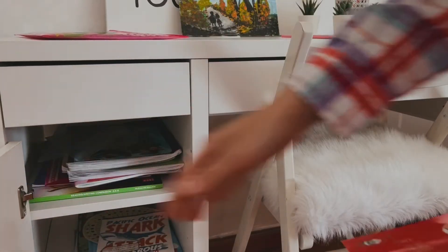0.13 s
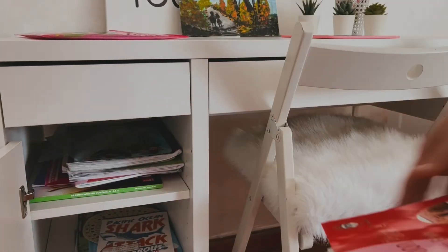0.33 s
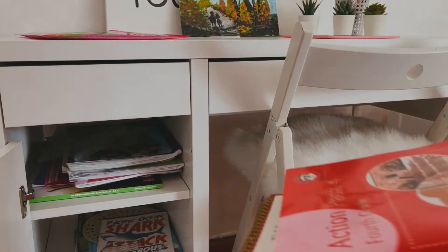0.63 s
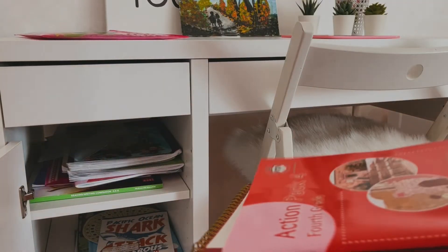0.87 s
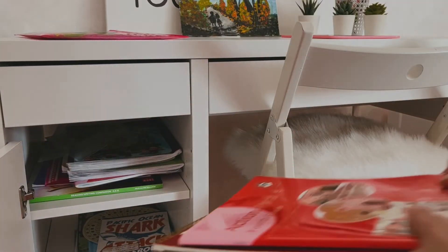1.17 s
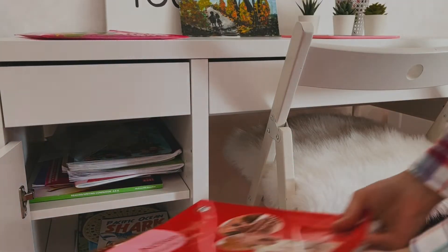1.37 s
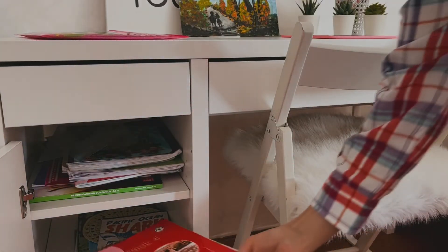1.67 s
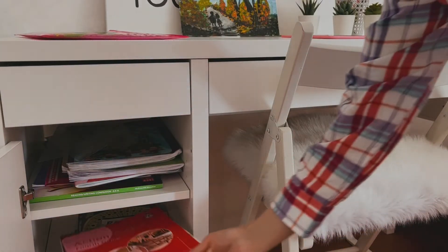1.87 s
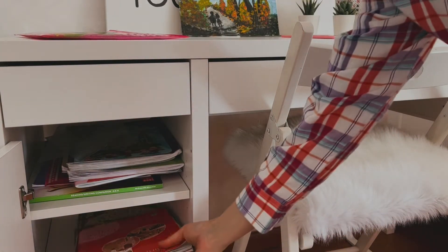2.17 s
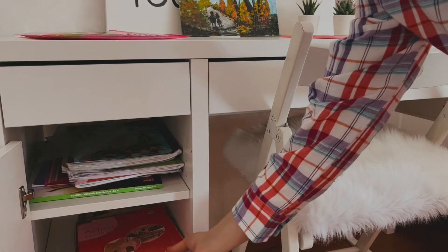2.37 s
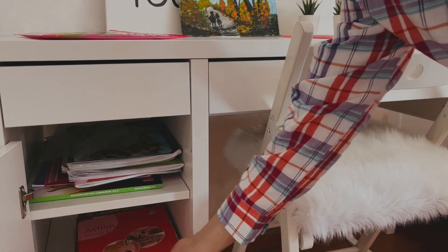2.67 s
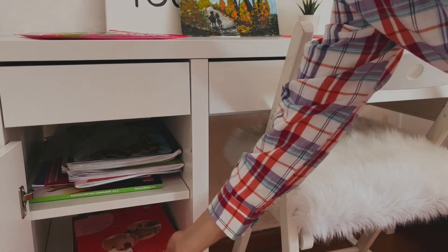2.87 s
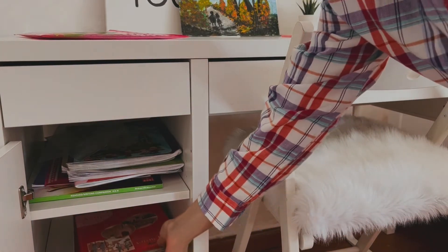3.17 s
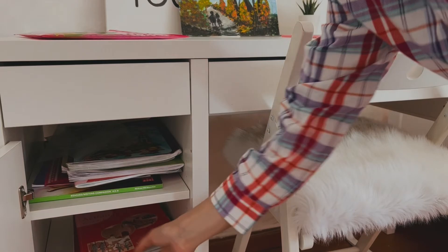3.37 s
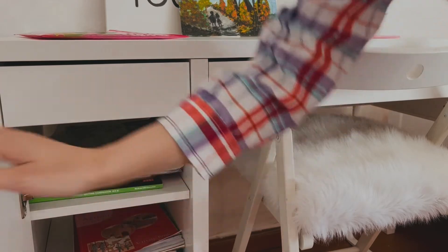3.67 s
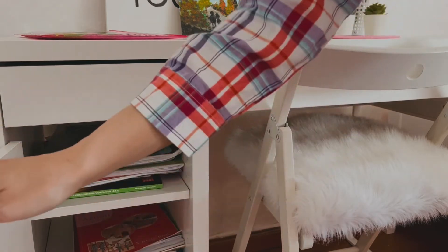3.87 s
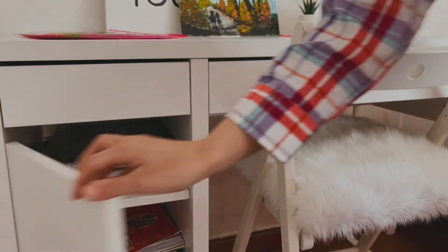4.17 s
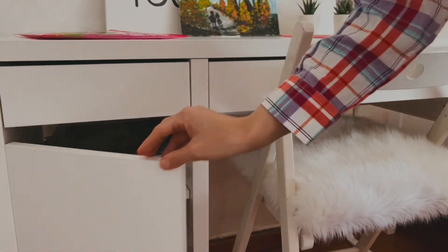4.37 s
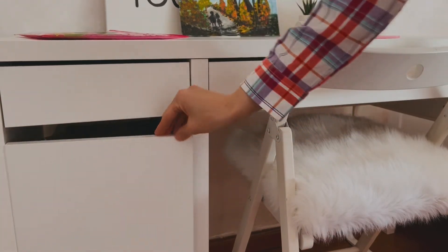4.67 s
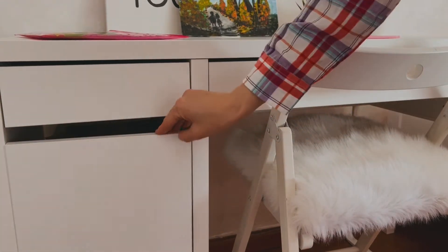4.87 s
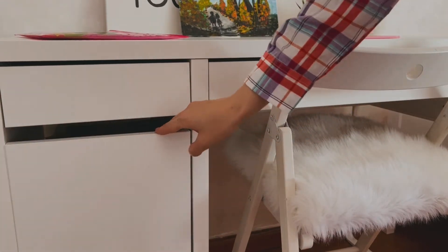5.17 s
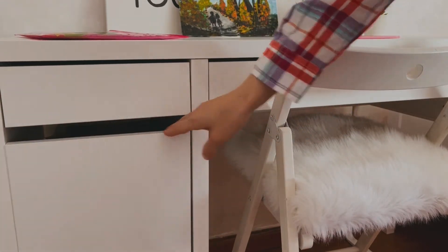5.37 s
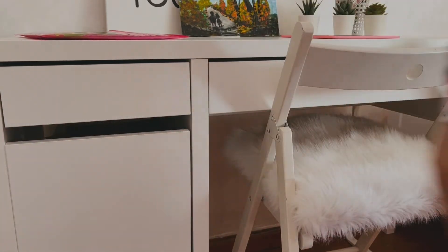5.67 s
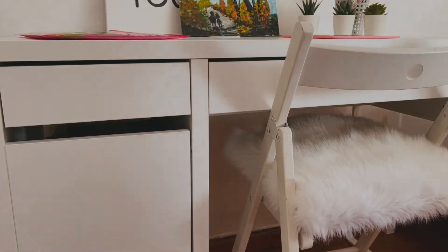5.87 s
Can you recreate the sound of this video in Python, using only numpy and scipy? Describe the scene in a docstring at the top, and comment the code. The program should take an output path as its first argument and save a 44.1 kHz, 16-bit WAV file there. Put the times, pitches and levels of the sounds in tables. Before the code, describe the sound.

Close stereo pickup in a quiet, softly reverberant home room. A light wooden cupboard door swings open with low, hollow thumps. A glossy book rubs, ticks and crackles, its cover slapping lightly. It drops on the bottom shelf with a woody thud, knocks and scrapes into place. After a pause the door rattles, swings and bumps shut twice, fingertips dragging and squeaking on its painted face.

```python
"""A low cupboard in a quiet room, a metre from a two-port microphone, over a faint rumble and hiss.
Its door swings open: struck panels ring, shaken boards boom. A glossy book is handled: noise bands rub,
tick and crackle, a cover slaps shut. The book is dropped and slid onto the bottom shelf, ringing its modes.
The door is swung shut with two bumps while fingertips drag and squeak on it through narrow resonances.
The room answers briefly through decaying noise echoes."""
import sys
import numpy as np
from scipy import signal
from scipy.fft import rfft, irfft, next_fast_len
from scipy.io import wavfile
from scipy.ndimage import uniform_filter1d

SR = 44100
rng = np.random.default_rng(int(sys.argv[2]) if len(sys.argv) > 2 else 0)


def to_wav(s):
    """Save 16-bit WAV."""
    ch = np.atleast_2d(s).T  # columns
    pcm = np.round(np.clip(ch, -1, 1) * 32767)  # PCM
    wavfile.write(sys.argv[1], SR, pcm.astype(np.int16))


N = 265261
T_S = np.arange(N) / SR

# Background density: f/Hz, relative density/dB per Hz
HUSH_SPECTRUM = [(25, -3.5), (50, 3), (100, -9.5), (200, -20.5), (500, -18.5), (1200, -31.5), (3000, -39),
                 (8000, -41.5), (12000, -35.5), (16000, -51.5)]
HUSH_RMS_DB = -71.5

# Panel modes: f/Hz, level/dB, t60/s (undamped by contact)
SHELF_MODES = [(62.5, -11.5, 0.27), (97.7, -7, 0.3), (157.5, -3.5, 0.26), (170.6, -3.5, 0.32),
               (195.3, 3, 0.33), (237.4, -2, 0.24), (268, 6, 0.2), (315.5, -6, 0.31), (347, -5.5, 0.11),
               (371.2, -0.5, 0.14), (420.6, -9, 0.088), (458, -3.5, 0.17), (478, -6, 0.1), (524.2, 5, 0.12),
               (571.6, 0, 0.068), (614, -8.5, 0.075), (639.4, -8.5, 0.14), (717, -9, 0.21),
               (777, -1, 0.056), (858, 0, 0.05), (987, -2, 0.044), (1043, -8, 0.05), (1117, 1.5, 0.049),
               (1200, -3, 0.045), (1294, -3.5, 0.031), (1421, -9, 0.051), (1630, -19, 0.024),
               (1900, -18.5, 0.04), (3800, -21.5, 0.023)]
DOOR_MODES = [(56, -9.5, 0.38), (74.9, 0.5, 0.46), (99, -1, 0.17), (120.4, -0.5, 0.14), (144.8, -1, 0.21),
              (176.6, -1, 0.14), (205.8, 0, 0.17), (250.9, 0.5, 0.14), (324.3, 0.5, 0.1), (396.5, -2, 0.16),
              (481, 0, 0.088), (554, 3.5, 0.059), (705, 7, 0.041), (897, 4, 0.022), (1230, -9.5, 0.021),
              (1447, -31, 0.022), (1850, -4.5, 0.032)]

# Strokes below: t/s is when full level is reached; rise/s and fall/s are the times for 20 dB.
# Panels shaken by the swinging door and the sliding book: t/s, rise/s, hold/s, fall/s, boom/dB, wood/dB
SHAKES = [(0.0, .1, .0, 0.22, -39, -48.5), (0.17, 0.23, 0, 0.34, -46.5, -58),
          (1.1, 0.18, 0.75, 0.16, -61.5, -69), (2.05, 0.016, 0.0092, 0.09, -65.5, -32),
          (2.16, 0.036, 0.029, .1, -58, -61.5), (2.28, 0.092, 0.028, 0.05, -71, -36.5),
          (2.42, 0.16, 0.11, 0.077, -57, -59), (3.0, 0.42, 0.25, 0.093, -62.5, -64.5),
          (4.33, 0.2, 0.084, 0.25, -54, -52), (4.55, 0.52, 0.076, 0.044, -50, -68),
          (4.82, 0.1, 0.018, 0.13, -73, -48.5), (4.95, 0.086, 0.0067, 0.13, -52.5, -59.5),
          (5.08, 0.064, 0.11, 0.12, -55.5, -62)]
# Shaking that never rests: boom/dB, wood/dB
SHAKE_REST_DB = (-71.5, -80.5)
# Nearly shut door rolling on the air of the cupboard: t/s, rise/s, hold/s, fall/s, level/dB
AIR_ROLLS = [(4.36, 0.1, 0.16, 0.16, -44.5), (4.69, .015, 0.052, 0.18, -45), (4.95, .1, 0.054, 0.2, -58.5),
             (5.28, .015, 0.039, 0.11, -50)]

# Blows of door, hinge and frame: t/s, level/dB, bass/dB, board/dB, 500 Hz/dB, 1200 Hz/dB, slap/dB,
# settling/s, settling/dB
DOOR_BLOWS = [(0.048, -38, -15, -35, -8.5, -14, -47, 0.037, 1),
              (0.067, -31, -31, -5, -37, -32, -76, 0.15, -6),
              (0.212, -38.5, -1, -5, -24.5, -31, -87, 0.057, -3),
              (3.784, -51.5, 10, -10, -24, -34, -88, 0.028, 3),
              (3.869, -64, 3.5, -5.5, -21.5, -38, -87.5, 0.02, -5),
              (4.134, -56, -17, -4.5, -4.5, -19.5, -88, 0.01, -2.5),
              (4.14, -46.5, -15, 1, -5, -2, -90, 0.0059, 4),
              (4.147, -40.5, -18, 1, -6, -13, -93, 0.017, 6.5),
              (4.158, -32, -40, -8, -18.5, -23, -90, 0.03, 0),
              (4.177, -41, -25, 0.5, -5, -23, -80, 0.02, -3), (4.21, -36, -25, -8, -14, -22, -85, 0.023, 2),
              (4.356, -39, -7, -18.5, -17.5, -31, -86, 0.051, 5),
              (4.439, -31.5, -21, -21, -29.5, -28, -84, 0.07, 1.5),
              (4.487, -41, -14, -13, -20, -30, -86, 0.035, -2),
              (4.53, -46.5, -11, -12, -28, -34, -87, 0.033, 3),
              (4.678, -24, -20, -15.5, -13, -29, -48.5, 0.021, -8),
              (4.69, -29, -14, -10, -20, -28, -64, 0.024, 0.5),
              (4.756, -38, -25, -15, -16, -14.5, -84, 0.086, -11),
              (5.265, -36, -8.5, -14, -18, -27, -65, 0.021, -3)]
# Blows of the book on the shelf: same columns
BOOK_BLOWS = [(1.649, -51, -12.5, -15, 9, -10.5, -57.5, 0.021, 1.5),
              (1.662, -54, -4, -12, -1, -22, -84, 0.0092, -3.5),
              (1.69, -62.5, -10, -8, 6.5, -12, -85, 0.0095, -4.5),
              (1.732, -61.5, 2, -2.5, 5, -17.5, -85, 0.01, -6),
              (1.765, -69.5, 1.5, -7.5, -0.5, -17, -89, 0.012, -6),
              (2.037, -25.5, -14.5, -3, -26.5, -12.5, -53, 0.02, -8.5),
              (2.057, -28.5, -12.5, -2.5, -33.5, -31, -57, 0.021, -1.5),
              (2.1, -32.5, -8, -15, -24.5, -29.5, -67, 0.014, -0.5),
              (2.08, -31.5, -15, -7, -31, -32, -65, 0.011, -4.5),
              (2.125, -34.5, -14, -17, -27.5, -30.5, -70.5, 0.014, -2.5),
              (2.193, -48.5, -6, -11.5, -25, -31, -57.5, 0.055, -3),
              (2.241, -31.5, -28, -12, 6, 0, -51.5, 0.0074, -9),
              (2.258, -31.5, -21, -11.5, -9.5, -17, -67, 0.0072, -4.5),
              (2.309, -34.5, -29, -16.5, -14, -25, -59, 0.011, 2.5),
              (2.345, -47.5, -23, -9.5, -8.5, -11, -73, 0.019, -4),
              (2.43, -48, -31, -19, -5.5, -18, -73, 0.026, -2),
              (2.772, -49, -11, 2, -4.5, -30.5, -66, 0.0085, 1.5),
              (2.797, -47, -21, -2.5, -18, -37, -65, 0.014, 1.5),
              (2.835, -50.5, -15, -3, -24, -27, -74, 0.019, -8),
              (2.87, -54, -20, -8, -28, -33, -77, 0.011, -15)]
# Colour anchors, f/Hz: bass, fixed 0 dB, board, 500 Hz, 1200 Hz
SHELF_COLOUR_HZ = [80, 180, 280, 520, 1200]
DOOR_COLOUR_HZ = [65, 135, 260, 520, 1200]
# Each blow lands elsewhere and loads the panel differently
DETUNE_RATIO, UNEVEN_DB = .007, 1.5

# Hand on the door: t/s, rise/s, hold/s, fall/s, scuff/dB, papery edge/dB, fizz/dB, dull part/dB
DOOR_RUBS = [(0.048, 0.07, 0.0015, 0.1, -66.5, -76, -72, -59.5),
             (0.2, 0.068, .0, 0.087, -85, -85, -80, -65),
             (4.146, 0.014, 0.012, 0.12, -68.5, -97, -94, -48.5),
             (4.198, 0.052, 0.013, 0.28, -58, -94, -84, -50), (4.33, 0.11, 0.13, 0.13, -85, -80, -94, -58),
             (4.45, .1, 0.03, 0.056, -84, -83, -92, -65.5), (4.55, .08, 0, 0.027, -90, -89, -93, -70),
             (4.685, 0.011, 0.0066, 0.031, -54, -82, -53, -49), (4.719, 0.029, 0, 0.1, -61, -88, -92, -51),
             (4.836, 0.006, 0.015, 0.04, -87, -94, -88, -59.5),
             (4.87, 0.029, 0.00011, 0.14, -62.5, -82, -66, -50.5),
             (5.075, 0.025, 0.07, 0.098, -86, -99, -87, -59),
             (5.269, 0.015, 0.0021, 0.1, -69, -81, -89, -59),
             (5.64, 0.074, 0.0026, 0.048, -73, -89, -93, -73.5)]
# Cover and pages rubbing: same columns
BOOK_RUBS = [(0.465, 0.028, 0.019, 0.092, -68.5, -79, -59.5, -71),
             (0.58, 0.012, 0.13, 0.061, -72.5, -81, -70, -72.5),
             (0.695, 0.04, 0.021, 0.14, -67.5, -73, -66.5, -71),
             (0.77, 0.027, 0.0017, 0.046, -73, -80, -73, -63), (0.82, 0.048, 0, 0.11, -70.5, -73, -64, -93),
             (1.058, 0.091, 0.012, 0.014, -66.5, -69, -59, -67),
             (1.093, 0.011, 0.017, 0.032, -67, -76, -63, -60),
             (1.116, 0.024, 0.014, 0.044, -65.5, -79, -59.5, -59),
             (1.235, 0.031, 0.013, 0.036, -62, -78, -71, -61),
             (1.19, 0.05, 0.013, 0.037, -73, -80, -70, -61),
             (1.31, 0.091, 0.051, 0.19, -70.5, -84, -98, -71),
             (1.485, 0.11, 0.000023, 0.13, -69.5, -84, -79, -61.5),
             (1.66, 0.028, .0, 0.12, -67.5, -77, -67, -57), (1.78, 0.1, 0.16, 0.16, -85, -91, -80.5, -81.5),
             (2.042, 0.023, 0.097, 0.35, -71, -64.5, -63.5, -59.5),
             (2.242, 0.1, 0.027, 0.085, -61.5, -60.5, -60, -63.5),
             (2.47, 0.17, 0.035, 0.033, -99, -89, -76, -77),
             (2.71, 0.13, 0.038, 0.12, -81.5, -89, -79, -81),
             (2.775, 0.013, 0.13, .2, -77.5, -80, -74.5, -76),
             (2.93, 0.27, 0.05, 0.25, -83, -67, -63.5, -65),
             (3.12, 0.077, 0.072, 0.12, -87, -74.5, -76.5, -67.5),
             (3.24, 0.22, 0.047, 0.021, -87.5, -80, -80, -85.5)]
# Faint hiss slowly swelling and fading: same columns
HISS_SWELLS = [(1.301, 0.31, 0.49, .15, -91, -80.5, -76.5, -96),
               (3.4, 0.43, 0.18, 0.44, -92.5, -91, -94, -93),
               (3.68, 0.26, 0.061, 0.34, -95, -84, -81.5, -86), (4.06, 0.26, 0.2, .3, -88, -87.5, -83, -80),
               (5.348, 0.46, 0.77, 0.39, -87, -86, -79, -82)]
# Clothing that never quite rests: scuff/dB, papery edge/dB, fizz/dB, dull part/dB
CLOTH_REST_DB = (-101.5, -100, -92.5, -91.5)
# Swell and fade of each part, as a share of the scuff's dB
EDGE_FADE, FIZZ_FADE, DULL_FADE = 1.28, 1.4, 0.98
# Glossy covers fizz higher than painted board
BOOK_FIZZ_TOP_HZ, DOOR_FIZZ_TOP_HZ = 14900, 11060

# Cover and page edges snapping: t/s, edge level/dB, f/Hz, body level/dB, decay/s
TICKS = [(0.205, -58.5, 3170, -67, 0.0014), (0.484, -46, 4870, -73, 0.0016),
         (0.591, -52.5, 4460, -55.5, 0.0022), (0.693, -42.5, 4340, -50, 0.0016),
         (0.828, -47, 5400, -47.5, 0.0016), (1.032, -50, 3600, -56, 0.003),
         (1.058, -44.5, 3600, -51, 0.0028), (1.079, -44.5, 4800, -55, 0.0015),
         (1.089, -40, 2280, -46.5, 0.0053), (1.115, -39.5, 3730, -61, 0.0018),
         (1.185, -49, 2390, -60, 0.003), (1.201, -52, 2500, -46.5, 0.0022),
         (1.2253, -47, 2040, -39.5, 0.0034), (1.283, -48.5, 6600, -69, 0.0023),
         (1.679, -56, 11000, -79, 0.0037), (2.068, -46.5, 3740, -75, 0.011),
         (3.57, -62.5, 2230, -92.5, 0.0019)]
# Resonant patches of the rubbed cover, and one short dull knock near 600 Hz:
# t/s, rise/s, hold/s, fall/s, level/dB, f/Hz, width/Hz
BOOK_RESONANCES = [(0.457, .01, 0.018, 0.073, -61, 4500, 600), (0.458, 0.011, 0.026, 0.068, -69, 2580, 900),
                   (0.584, .01, .004, .03, -69, 4500, 1000), (0.628, 0.047, 0.024, .04, -74, 4500, 500),
                   (0.68, 0.013, 0.011, 0.035, -61, 4430, 700),
                   (0.683, .015, 0.016, 0.045, -68.5, 2600, 600), (0.77, .02, .02, .03, -67.5, 1390, 600),
                   (0.81, 0.0081, 0.014, 0.021, -66, 5000, 600),
                   (0.821, 0.014, 0.0087, 0.032, -61.5, 1120, 400),
                   (0.824, .02, 0.016, 0.039, -72, 3500, 400), (1.856, .004, 0.0069, 0.02, -67.5, 600, 293),
                   (1.078, .005, .003, .012, -64, 2400, 600), (1.18, .006, .008, .008, -65, 2400, 700),
                   (1.053, .02, 0.0064, .008, -56, 3440, 800), (2.046, .006, 0.033, .05, -66.5, 3800, 496),
                   (1.091, .004, 0.0055, 0.023, -59.5, 2300, 400),
                   (1.114, .012, 0.0074, .025, -68, 3580, 900)]
# Door face resonances singing under the fingers: same columns
DOOR_SQUEAKS = [(4.872, 0.027, .02, 0.036, -55, 755, 40), (4.925, .015, 0.042, 0.034, -64, 1450, 25),
                (5.097, .02, 0.035, 0.026, -78, 1440, 40), (5.125, .02, .04, 0.034, -60, 434, 40)]
# Crackling patches of the cover: f/Hz
COVER_PATCH_HZ = [1260, 2024, 3370, 4140, 6535]
CRACKLE_RE_SCUFF_DB = -6
# Stiff cover slapping shut: t/s, peak/dB, low edge f/Hz, high edge f/Hz
COVER_SLAP = (1.2264, -32, 350, 4000)

# Book's underside sliding on the shelf: t/s, rise/s, hold/s, fall/s, level/dB
SLIDES = [(1.66, 0.022, 0.0092, 0.065, -68), (2.25, .015, 0.023, 0.089, -51),
          (2.34, 0.074, 0.02, 0.088, -60.5), (2.44, 0.056, 0.029, 0.084, -81),
          (2.91, 0.09, 0.031, 0.11, -75.5), (2.99, 0.088, 0.036, 0.14, -63.5),
          (3.14, 0.093, 0.02, 0.08, -62.5), (3.2, 0.06, 0.015, 0.076, -65.5)]
# Fingertips dragged on the door face: t/s, rise/s, hold/s, fall/s, level/dB
DRAGS = [(4.2, 0.051, 0.049, 0.16, -62.5), (4.3, 0.05, 0.057, 0.23, -64),
         (4.695, 0.015, 0.0092, 0.074, -50), (4.84, 0.0046, 0.034, 0.058, -66.5),
         (4.89, 0.042, 0.035, 0.041, -53), (5.135, 0.073, 0.0039, 0.042, -61)]
# Resonances they excite: f/Hz, width/Hz, level/dB
DRAG_MODES = [(391.3, 9.7, 0.5), (476, 35, -23), (738, 25, -4.5), (1045, 6.9, -15.5), (1418, 12, -14),
              (1735, 27, -15.5), (1967, 42, -13), (2426, 29, -22.5), (2613, 22, -32), (2970, 83, -21.5),
              (3430, 70, -18.5), (3900, 82, -20)]

# Room decay: f/Hz, t60/s
ROOM_T60 = [(60, 0.32), (500, 0.44), (2000, 0.26), (10000, 0.2)]
ROOM_DB, SCATTER_DB = -4, 0.5
# Random drift of the blend of echo patterns
BLEND_DRIFT_PER_S, BLEND_DRIFT_RAD = 12, 1.5
# Two ports: f/Hz, left lead/rad, likeness/0-1, left minus right/dB
PORTS = [(0, 0, .99, -.5), (125, 0, .96, -.5), (250, 0, .85, .4), (500, -1.1, .62, 2.8),
         (1000, -.4, .5, .5), (1700, 0, .4, 0), (2400, .8, .78, 3), (4500, .8, .75, 3), (5200, 0, .6, 2),
         (6200, -1.2, .7, 1), (7900, -3.0, .94, 0), (8600, -3.2, .95, 0), (10000, -4.7, .9, 0),
         (11400, -6.15, .95, 0), (12500, -6.4, .93, 0), (14100, -8.2, .88, 0), (15500, -9.45, .99, 0)]
MIC_LOW_HZ, TOP_HZ = 39.6, 15600


def undb(db):
    """Amplitude ratio from dB."""
    return 10 ** (np.asarray(db) / 20)


def unit(x):
    """Scale to rms 1."""
    return x / np.sqrt(np.mean(x ** 2))


def band(x, lo_hz, hi_hz, order=2):
    """Butterworth band-pass."""
    edges_hz = [lo_hz, min(hi_hz, .45 * SR)]
    return signal.sosfilt(signal.butter(order, edges_hz, "bandpass", fs=SR, output="sos"), x)


def walk(rate_per_s):
    """Random levels held 1 / rate and slewed twice; spread near 1."""
    hold = int(SR / rate_per_s)
    steps = np.repeat(rng.standard_normal(N // hold + 1), hold)
    return 0.58 * uniform_filter1d(uniform_filter1d(steps, hold), hold)[:N]


def grit(per_s, spread_db, smooth):
    """Friction slips of uneven size and random sign over a smooth hiss."""
    size_db = spread_db * np.minimum(rng.exponential(size=N), 3)
    struck = rng.random(N) < per_s / SR
    slips = struck * undb(size_db) * rng.choice([-1, 1], N)
    return unit(slips) + smooth * rng.standard_normal(N)


def add(out, start_s, x):
    """Mix x into out from start_s."""
    i = int(start_s * SR)
    out[i:i + len(x)] += x[:N - i]


def strokes(table, shares=(1, 1, 1, 1)):
    """Power-summed dB of each level column; strokes rise, hold and fall in straight dB lines."""
    t = T_S[::32]
    start, rise, hold, fall, *levels_db = (c[:, None] for c in np.transpose(table))
    before = (start - t) / np.maximum(rise, .002)
    after = (t - start - hold) / np.maximum(fall, .002)
    shape_db = -20 * np.maximum(0, np.maximum(before, after))
    tracks = []
    for level_db, share in zip(levels_db, shares):
        power = np.sum(undb(level_db + share * shape_db) ** 2, axis=0)
        tracks.append(np.interp(T_S, t, 10 * np.log10(1e-20 + power)))
    return tracks


def steady(levels_db):
    """A stroke that holds throughout."""
    return [(0, 1, N / SR, 1, *levels_db)]


def ringing(db, modes, lo_hz, hi_hz, damping, per_s):
    """Gritty jostling rings the modes between two frequencies; damping divides their t60."""
    t = T_S[:SR // 2]
    ring = np.zeros(len(t))
    for hz, gain_db, t60_s in modes:
        if lo_hz < hz < hi_hz:
            ring += np.sin(2 * np.pi * hz * t) * undb(gain_db - 60 * damping * t / t60_s)
    jostle = unit(grit(per_s, 4.0, 0.94)) * undb(db)
    return signal.fftconvolve(jostle, ring / np.linalg.norm(ring))[:N]


def hush():
    """Distant house and street rumble with faint microphone hiss: half-octave noise, wavering levels."""
    hz, db = np.transpose(HUSH_SPECTRUM)
    out = np.zeros(N)
    for centre in 25 * 2 ** np.arange(0, 9.5, .5):
        noise = unit(band(rng.standard_normal(N), centre / 2 ** .25, centre * 2 ** .25))
        level_db = np.interp(np.log(centre), np.log(hz), db) + 1.6 * walk(5.5)
        out += noise * np.sqrt(centre) * undb(level_db)  # density to band level
    return unit(out) * undb(HUSH_RMS_DB)


def shaking():
    """The big door panel booms and rolls on its low modes, the smaller boards hum."""
    boom_db, wood_db = strokes(SHAKES + steady(SHAKE_REST_DB))
    roll = ringing(strokes(AIR_ROLLS)[0], DOOR_MODES, 90, 130, damping=0.89, per_s=200.)
    boom = ringing(boom_db, DOOR_MODES, 0, 130, damping=0.8, per_s=140.0)
    wood = ringing(wood_db, DOOR_MODES + SHELF_MODES, 130, 420, damping=1.0, per_s=120.)
    return roll + boom + wood


def blows(table, modes, colour_hz, slap_t60_s):
    """A blow and the small contacts that follow it ring the panel modes; the surfaces slap."""
    out, t = np.zeros(N), T_S[:SR // 2]
    hz, mode_db, t60_s = (c[:, None] for c in np.transpose(modes))
    sign = (-1) ** np.arange(len(hz))[:, None]
    for start_s, level_db, *colour_db, slap_db, settle_s, settle_db in table:
        contact_noise, slap_noise = rng.standard_normal((2, len(t)))
        shift, uneven = rng.standard_normal((2, len(hz), 1))
        decay = undb(mode_db + UNEVEN_DB * uneven - 60 * t / t60_s)
        rings = sign * np.sin(2 * np.pi * hz * (1 + DETUNE_RATIO * shift) * t) * decay

        settle_s = max(settle_s, .002)
        push = undb(settle_db) * contact_noise * np.exp(-t / settle_s) / np.sqrt(settle_s * SR)
        push[0] += 1  # the blow itself

        anchors_db = np.insert(colour_db, 1, 0)
        colour = undb(np.interp(np.log(hz[:, 0]), np.log(colour_hz), anchors_db))
        add(out, start_s, undb(level_db - 2.0) * signal.fftconvolve(colour @ rings, push)[:len(t)])
        slap = band(slap_noise, 1200, 9200, order=1)
        add(out, start_s, undb(slap_db - 60 * t / slap_t60_s) * slap)
    return out


def rubbing(table, fizz_top_hz):
    """Gritty friction: a scuff, a papery edge, a fizz on top and a dull part that passes into the wood."""
    scuff_db, edge_db, fizz_db, dull_db = strokes(table, (1, EDGE_FADE, FIZZ_FADE, DULL_FADE))
    slips = grit(1200., 3.4, 1.0) * undb(0.93 * walk(44))
    scuff = unit(band(slips, 1400, 3570)) * undb(scuff_db + 1.5 * walk(26))
    edge = unit(band(slips, 2630, 7030)) * undb(edge_db + 2 * walk(7.5))
    fizz = unit(band(slips, 6780, fizz_top_hz, order=3)) * undb(fizz_db + 1.0 * walk(7.0))
    wood_modes = SHELF_MODES + DOOR_MODES
    dull = ringing(dull_db + 2.0 * walk(24.86), wood_modes, 380, 1500, damping=1.8, per_s=400.)
    return scuff + edge + fizz + dull


def ticks():
    """Millisecond snaps with a broad edge and a papery pitch; the dull body follows more slowly."""
    out, t = np.zeros(N), T_S[:SR // 10]
    for start_s, edge_db, hz, body_db, decay_s in TICKS:
        snap_noise, body_noise = rng.standard_normal((2, len(t)))
        snap = snap_noise * np.exp(-t / max(decay_s, .0003))
        broad = band(snap, 900, 13000, order=1)
        pitched = band(snap, hz / 1.3, hz * 1.2, order=1)
        edge = 0.46 * broad + 1.3 * pitched
        swell = np.exp(-t / 0.0048) * (1 - np.exp(-t / 0.0014))
        body = band(body_noise * swell, 445, 1310)
        add(out, start_s, undb(edge_db - 4.0) * edge + undb(body_db + 10.5) * body)
    return out


def resonant_strokes(table):
    """Gritty noise passes through one resonance for each stroke."""
    slips = unit(grit(900., 3.6, 0.54))
    out = np.zeros(N)
    for *stroke, hz, width_hz in table:
        tone = unit(band(slips, hz - width_hz / 2, hz + width_hz / 2, order=1))
        out += tone * undb(strokes([stroke])[0])
    return out


def crackle():
    """The cover creases sparsely while it rubs, each patch with its own pitch."""
    creases = np.zeros(N)
    for hz in COVER_PATCH_HZ:
        creases += unit(band(grit(94.0, 4.9, 0.13), hz / 0.93, hz * 1.1, order=1))
    return unit(creases) * undb(strokes(BOOK_RUBS)[0] + CRACKLE_RE_SCUFF_DB)


def cover_slap():
    """The stiff cover slaps shut: one crisp, broad band-passed click."""
    start_s, peak_db, lo_hz, hi_hz = COVER_SLAP
    out = np.zeros(N)
    click = band(signal.unit_impulse(SR // 50), lo_hz, hi_hz)
    add(out, start_s, undb(peak_db) * click / np.max(np.abs(click)))
    return out


def sliding():
    """The book's scrape passes into the upper modes of the shelf."""
    level_db = strokes(SLIDES)[0] + 2.0 * walk(21)
    return ringing(level_db, SHELF_MODES, 420, 1500, damping=3.0, per_s=600.)


def dragging():
    """Skin sticks and slips on the painted door; narrow resonances come and go as the fingers move."""
    slips = unit(grit(285.0, 2.4, 0.76)) * undb(strokes(DRAGS)[0] + 2.2 * walk(40))
    out = np.zeros(N)
    for hz, width_hz, db in DRAG_MODES:
        tone = band(slips * undb(3.2 * walk(14)), hz - width_hz / 2, hz + width_hz / 2, order=1)
        out += undb(db) * np.sqrt(SR / np.pi / width_hz) * tone  # evens out the band power
    return out


def echoes():
    """Dense octave-band noise echoes, decaying by the room's t60 at each pitch."""
    t = T_S[:SR // 2]
    hz, t60_s = np.transpose(ROOM_T60)
    tail = np.zeros(len(t))
    for centre in 45 * 2 ** np.arange(9):
        decay_s = np.interp(np.log(centre), np.log(hz), t60_s)
        fall = undb(-60 * t / decay_s) * (1 - np.exp(-t / 0.00027))
        noise = band(rng.standard_normal(len(t)), centre / np.sqrt(2), centre * np.sqrt(2))
        tail += noise * fall / np.sqrt(np.sum(fall ** 2))
    return tail


def room(x, wet_db):
    """Two random echo patterns in a drifting blend, so no single pitch is held."""
    turn_rad = BLEND_DRIFT_RAD * walk(BLEND_DRIFT_PER_S)
    first = np.cos(turn_rad) * signal.fftconvolve(x, echoes())[:N]
    second = np.sin(turn_rad) * signal.fftconvolve(x, echoes())[:N]
    return undb(wet_db) * (first + second)


def ports(shared, scattered):
    """Ports share sound by likeness, with phase lead and level by pitch; scattered sound differs in sign."""
    size = next_fast_len(N + SR // 4)
    hz, *columns = np.transpose(PORTS)
    bins_hz = np.fft.rfftfreq(size, 1 / SR)
    lead_rad, alike, pan_db = (np.interp(bins_hz, hz, c) for c in columns)
    alike = np.clip(alike, 0, 1)
    side = np.array([[1], [-1]])  # left, right
    common = rfft(shared, size) * np.sqrt((1 + alike) / 2)
    differing = side * rfft(scattered, size) * np.sqrt((1 - alike) / 2)
    both = (common + differing) * np.exp(.5j * side * lead_rad) * undb(side * pan_db / 2)
    return irfft(both, size)[:, :N]


def bed():
    """All sustained layers: hush, shaking, friction."""
    book_cloth_and_hiss = rubbing(BOOK_RUBS + HISS_SWELLS + steady(CLOTH_REST_DB), BOOK_FIZZ_TOP_HZ)
    hand_on_door = rubbing(DOOR_RUBS, DOOR_FIZZ_TOP_HZ)
    resonant = resonant_strokes(BOOK_RESONANCES + DOOR_SQUEAKS)
    return hush() + shaking() + hand_on_door + book_cloth_and_hiss + resonant + sliding() + dragging()


def scene():
    """Hits sound direct and through the room; the shared and the scattered part each get their own bed."""
    door = blows(DOOR_BLOWS, DOOR_MODES, DOOR_COLOUR_HZ, slap_t60_s=0.018)
    cover = ticks() + crackle() + cover_slap()
    book = blows(BOOK_BLOWS, SHELF_MODES, SHELF_COLOUR_HZ, slap_t60_s=0.066)
    hits = door, cover, book
    # each group of hits has its own echo patterns
    near = sum(room(x, ROOM_DB) for x in hits)
    scattered = sum(room(x, SCATTER_DB) for x in hits)
    return ports(sum(hits) + near + bed(), scattered + bed())


def record(dry):
    """The microphone loses the deepest bass, the recorder cuts the top."""
    bass_cut = signal.butter(4, MIC_LOW_HZ, "highpass", fs=SR, output="sos")
    top_cut = signal.ellip(10, .2, 80, TOP_HZ, fs=SR, output="sos")
    return signal.sosfilt(top_cut, signal.sosfilt(bass_cut, dry))


dry = scene()
out = record(dry)
to_wav(out)
```